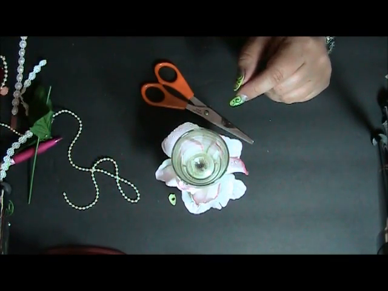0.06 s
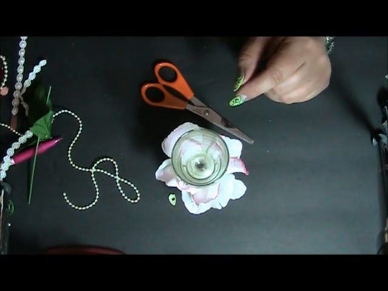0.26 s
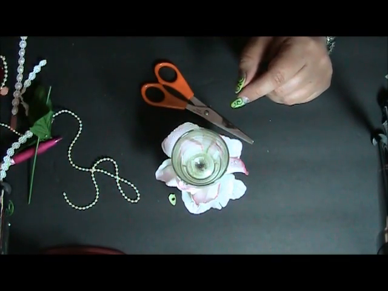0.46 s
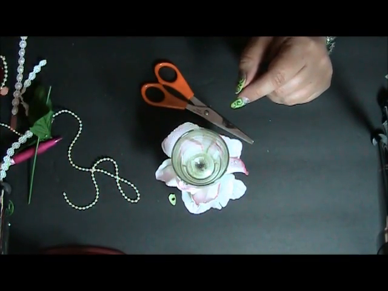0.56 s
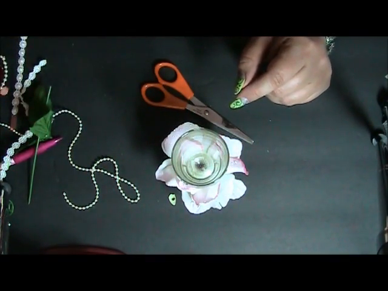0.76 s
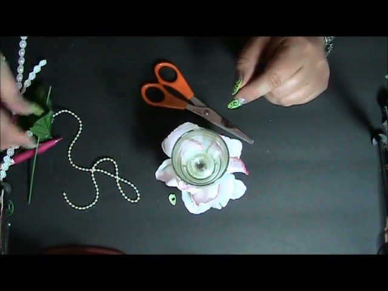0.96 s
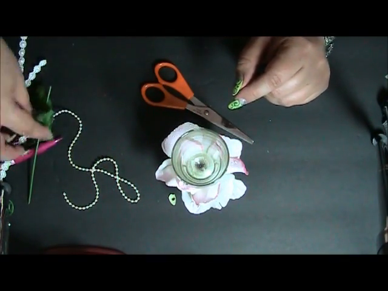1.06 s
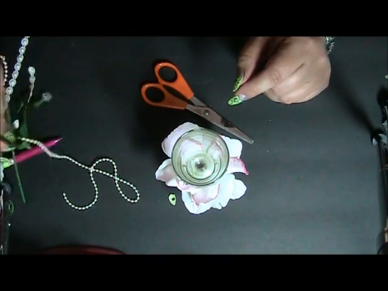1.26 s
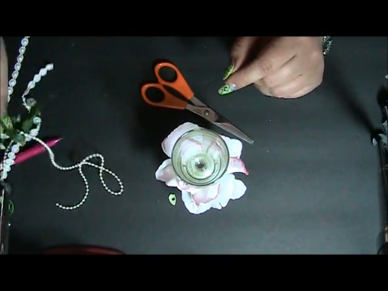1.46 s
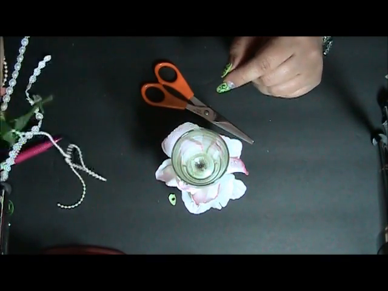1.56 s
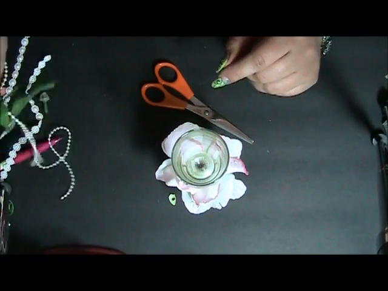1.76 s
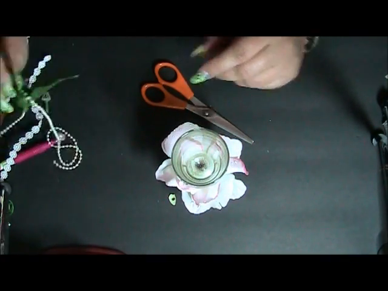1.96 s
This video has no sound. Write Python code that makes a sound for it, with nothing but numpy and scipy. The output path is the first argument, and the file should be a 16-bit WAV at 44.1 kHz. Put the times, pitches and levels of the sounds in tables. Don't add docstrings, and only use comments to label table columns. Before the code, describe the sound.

Stiff fabric leaves are brushed very faintly, then, after a pause, lifted with dry crinkling, plastic snaps and tiny bead ticks, close and slightly left in a softly humming, hissing indoor room.

```python
import sys
import numpy as np
from scipy import signal
from scipy.fft import rfft, irfft, next_fast_len
from scipy.io import wavfile
from scipy.ndimage import map_coordinates

SR = 44100
rng = np.random.default_rng(int(sys.argv[2]) if len(sys.argv) > 2 else 0)


def generate_wav(sig):
    pcm = np.round(np.clip(np.atleast_2d(sig).T, -1, 1) * 32767).astype(np.int16)
    wavfile.write(sys.argv[1], SR, pcm)


def amplitude_ratio(level_db):
    exponent = np.asarray(level_db, float) / 20
    return 10 ** exponent


N = 88861

# freq_hz, level_db
TICK_COLOUR = [(3500, -17), (6000, 0.5), (8500, -4.5), (11000, -6), (15500, -10.5)]


def handling():
    # time_s, effort_db, crispness_db
    lift_effort = [(1.078, -72, 12), (1.092, -39, 11.5), (1.125, -38.5, 3.5), (1.16, -41, 3),
                   (1.22, -40.5, -2.5), (1.29, -45.5, 1.5), (1.33, -40.5, -2), (1.35, -44, 2),
                   (1.40, -34.5, -3), (1.44, -39, 0.5), (1.525, -39.5, 0), (1.56, -48, 1.5), (1.64, -38, 4),
                   (1.69, -46, 5), (1.755, -49, 5), (1.78, -41, 0), (1.86, -44, 6), (2.015, -44.5, 0.5)]
    # freq_hz, density_db (per Hz)
    leaf_colour = [(290, -43.5), (500, -13), (629, -11.5), (1100, -10.5), (2570, -0.5), (4570, -7.5),
                   (5350, -16.5), (6740, -15.5), (15500, -59)]
    effort, crisp = curves(lift_effort)
    rub = coloured(clicks(.15, 2.5), leaf_colour) * amplitude_ratio(-6 + 2.4 * wobble(70))
    crinkle = amplitude_ratio(-8) * grains(rate=700, hz=2446, octaves=0.19, cycles=2.3, spread_db=3.5, taut_oct=0.2)
    sparkle = amplitude_ratio(-18.5) * grains(rate=800, hz=6770, octaves=.33, cycles=6.8, spread_db=5.5, taut_oct=0)
    two_sided = np.array([clicks(.1, 2.3), clicks(0.054, 2.3)])
    fizz = coloured(two_sided, TICK_COLOUR) * amplitude_ratio(-19 + 0.92 * wobble(90))
    return effort * (rub + crinkle + crisp * sparkle), effort * crisp * fizz


def snaps():
    # start_s, peak_db, ring_hz, bright_tick_db, t60_ms
    stem_snaps = [(.6488, -45, 1330, -25, 8), (.678, -46, 3300, -30, 11), (0.71, -49, 2760, -16, 8),
                  (.7403, -38.5, 3520, -20, 8.8), (1.093, -26, 2870, -9, 8.2),
                  (1.1061, -26, 3530, -19, 9.8), (1.1342, -27.5, 2470, -30, 13),
                  (1.168, -25, 2620, -32, 6.6), (1.1984, -17.5, 2500, -49, 10.5),
                  (1.2052, -23, 2880, -33, 3.5), (1.3133, -29, 2290, -30, 9.1),
                  (1.3191, -18.5, 3930, -28, 6), (1.3912, -22, 3610, -30, 8.3),
                  (1.3938, -20, 3080, -20.5, 8.8), (1.4055, -21.5, 2860, -28, 6.5),
                  (1.4109, -19, 2930, -30, 3.3), (1.478, -24.5, 2520, -21, 10),
                  (1.536, -34, 2460, -18, 7.5), (1.5769, -27.5, 2430, -21, 6.3),
                  (1.634, -14.5, 2553, -22, 12.2), (1.7024, -31, 3400, -20, 6),
                  (1.7033, -29.5, 2800, -20, 8.6), (1.7122, -27, 3240, -22, 6.6),
                  (1.7295, -29.5, 2980, -18, 6), (1.7434, -29.5, 2800, -20, 7),
                  (1.7636, -30, 3030, -29, 20), (1.7696, -19.5, 2730, -27, 9.2),
                  (1.9489, -31.5, 2630, -15, 4.4)]
    # ratio, level_db
    stem_partials = [(.67, -7), (1.004, 3), (1.36, -4.5), (1.599, -5.5), (1.95, -13), (2.55, -7)]
    # freq_hz, level_db
    crack_colour = [(700, -44), (1400, -9), (2400, -5), (4200, -2.5), (6500, -11), (10000, -22.5),
                    (15500, -24)]
    # freq_hz, level_db
    snap_tick_colour = [(3500, -21), (6300, -10), (8500, 0.5), (10000, -5.5), (15500, -17)]
    stiff_hz = 6020
    ring, crack, tick = np.zeros((3, N + SR))
    t = np.arange(SR // 20) / SR
    rise = 1 - np.exp(-t / .0003)
    for start_s, peak_db, ring_hz, bright_db, t60_ms in stem_snaps:
        span = slice(round(start_s * SR), round(start_s * SR) + len(t))
        noise = np.sign(rng.standard_normal((2, len(t))))
        fall_db = -60 * t / (t60_ms / 1000)
        tone = 0
        for ratio, level_db in stem_partials:
            hz = ring_hz * ratio
            level = amplitude_ratio(level_db + rng.uniform(-0.58, 1.65)) / (1 + (hz / stiff_hz) ** 4)
            tone = tone + level * np.sin(2 * np.pi * hz * t)
        ring[span] += amplitude_ratio(peak_db - 1 + fall_db) * rise * tone
        crack[span] += amplitude_ratio(peak_db - 10 + fall_db / 0.76) * rise * noise[0]
        tick[span] += amplitude_ratio(peak_db + bright_db + 2 + fall_db / 0.91) * np.sqrt(rise) * noise[1]
    return ring[:N] + coloured(crack[:N], crack_colour), coloured(tick[:N], snap_tick_colour)


def creases():
    # start_s, level_db, pitch_hz
    crease_events = [(0.682, -44, 2760), (1.1003, -36, 2380), (1.1185, -30, 2440), (1.1444, -32, 2310),
                     (1.1836, -38, 2470), (1.2291, -33, 2200), (1.2456, -29.5, 2360), (1.2643, -39, 2370),
                     (1.2692, -39, 2410), (1.2796, -31, 2350), (1.3012, -38, 2560), (1.3236, -36, 4000),
                     (1.3294, -37.7, 3790), (1.3686, -33, 2520), (1.3746, -36, 2540), (1.383, -28.5, 2450),
                     (1.4169, -39, 3540), (1.4296, -34, 2520), (1.4437, -34, 2220), (1.4463, -28.5, 2600),
                     (1.4566, -29, 2440), (1.4604, -33.3, 2490), (1.4631, -32, 2550), (1.4847, -35, 2440),
                     (1.4907, -33, 2430), (1.4958, -31, 2000), (1.508, -33.8, 2400), (1.5152, -33.4, 2500),
                     (1.5217, -33, 2460), (1.5254, -29, 2470), (1.5285, -29, 2360), (1.5851, -33, 2350),
                     (1.589, -39, 2240), (1.6224, -30, 2590), (1.6284, -35, 2560), (1.6422, -39, 2460),
                     (1.6462, -34, 2230), (1.687, -35, 3060), (1.6921, -34.9, 2720), (1.7255, -35, 3680),
                     (1.7764, -34, 2720), (1.7859, -35, 2880), (1.8038, -32, 3090), (1.8153, -41, 2530),
                     (1.8419, -36, 3270), (1.8481, -35.5, 2900), (1.8693, -42, 3010), (1.8951, -38, 2950),
                     (1.8996, -41, 2760), (1.9058, -38.3, 2740), (1.931, -32.5, 2730), (1.9413, -43, 2340),
                     (1.9611, -34, 2590), (1.9783, -34, 2440), (1.9809, -44, 2570), (1.9932, -38.8, 2500)]
    # ratio, level_db
    fold_partials = [(.66, -12.5), (1, 0.5), (1.45, -9)]
    return folds(crease_events, 5.5, -3, fold_partials)


def pings():
    # start_s, level_db, pitch_hz
    ping_events = [(0.6407, -39.5, 8250), (0.7401, -46, 5950), (1.0931, -39, 6960), (1.0958, -39, 6860),
                   (1.1012, -40, 6740), (1.1156, -29, 9200), (1.1359, -38.2, 6470), (1.1682, -44, 6300),
                   (1.1979, -59, 6600), (1.2177, -45, 5300), (1.3197, -48, 5450), (1.3233, -48, 5250),
                   (1.3928, -41, 5160), (1.3949, -35, 8050), (1.4105, -45, 5510), (1.4316, -36, 6200),
                   (1.4778, -40.3, 5500), (1.5299, -36, 6200), (1.535, -34.5, 5370), (1.5769, -52, 6070),
                   (1.5805, -34, 6330), (1.5831, -38, 6500), (1.6357, -26, 6330), (1.6651, -32.5, 5510),
                   (1.7697, -34, 5750), (1.8612, -41, 6720), (.6325, -53, 8000), (.6525, -48, 8000),
                   (.7195, -51, 8100), (.724, -53, 7900), (1.6355, -24, 4160)]
    return folds(ping_events, 11, -3, [(0.97, 0)])


def folds(events, cycles, gain_db, partials):
    x, t = np.zeros(N + SR), np.arange(SR // 100) / SR
    for start_s, level_db, pitch_hz in events:
        u = t * pitch_hz / cycles
        rough = .22 * np.cumsum(rng.standard_normal(len(t))) * np.sqrt(pitch_hz / SR)
        tone = 0
        for ratio, partial_db in partials:
            phase = 2 * np.pi * (pitch_hz * ratio * t + rng.random()) + rough
            tone = tone + amplitude_ratio(partial_db) * np.sin(phase)
        swell = (2 * np.e * u * np.exp(-2 * u)) ** 2
        x[round(start_s * SR):][:len(t)] += amplitude_ratio(level_db + gain_db) * swell * tone
    return x[:N]


def beads():
    # start_s, peak_db
    bead_ticks = [
        (1.1348, -28.5),
        (1.7637, -41),
        (1.817, -41),
        (1.8388, -52),
        (1.8476, -46),
        (1.853, -40),
        (1.8616, -34.5),
        (1.8655, -42),
        (1.8922, -49),
        (1.7155, -42),
    ]
    # freq_hz, level_db
    bead_colour = [(4000, -34), (7000, 1), (11000, 0), (15000, 4)]
    x, t = np.zeros(N + SR), np.arange(200) / SR
    for start_s, peak_db in bead_ticks:
        noise = np.sign(rng.standard_normal(len(t)))
        x[round(start_s * SR):][:len(t)] += amplitude_ratio(peak_db - 0.5 - 60 * t / 0.0057) * noise
    return coloured(x[:N], bead_colour)


def brush():
    # time_s, effort_db, crispness_db
    brush_effort = [
        (.626, -68, 3),
        (.634, -57, 6),
        (.685, -56.5, -2),
        (.70, -61.5, -4),
        (.75, -60, -7),
        (.765, -68.5, 5.5),
        (.96, -72, 5.5),
    ]
    # freq_hz, density_db (per Hz)
    sleeve_colour = [(240, -57), (400, -0.5), (1020, -3.5), (1690, 0.5), (2280, -6), (3310, -2),
                     (14000, -29)]
    effort, crisp = curves(brush_effort)
    rub = coloured(clicks(.1, 4.0), sleeve_colour) * amplitude_ratio(0.5 + 2.2 * wobble(59.3))
    edge = amplitude_ratio(-9.5) * coloured(clicks(0.095, 4.1), TICK_COLOUR)
    return effort * (rub + crisp * edge)


def thuds():
    # start_s, level_db, pitch_hz
    finger_bumps = [
        (.648, -53, 411),
        (.731, -58, 612),
        (1.084, -44.5, 760),
        (1.132, -43.5, 708),
        (1.16, -59, 200),
        (1.411, -55.5, 197),
        (1.769, -52.5, 209),
        (1.99, -50.5, 707),
    ]
    x, t = np.zeros(N + SR), np.arange(SR // 8) / SR
    for start_s, level_db, pitch_hz in finger_bumps:
        u = t * pitch_hz / 11.3
        rough = 2.48 * map_coordinates(rng.standard_normal(200), [t * pitch_hz * 0.408])
        tone = np.sin(2 * np.pi * pitch_hz * t + rough)
        x[round(start_s * SR):][:len(t)] += amplitude_ratio(level_db) * 5 * u * np.exp(-3 * u) * tone
    return x[:N]


def unit(x):
    return x / np.sqrt(np.mean(x ** 2) + 1e-20)


def along(points, hz):
    f, v = np.transpose(points)
    return np.interp(np.log(hz + 1), np.log(f + 1), v)


def curves(rows):
    time_s, effort_db, crisp_db = np.transpose(rows)
    t = np.arange(N) / SR
    effort = amplitude_ratio(np.interp(t, time_s, effort_db, left=-120, right=-120))
    return effort, amplitude_ratio(np.interp(t, time_s, crisp_db))


def wobble(rate):
    knots = rng.standard_normal(int(N * rate / SR) + 4)
    return map_coordinates(knots, [np.arange(N) * rate / SR])


def coloured(x, points):
    m = 2 * next_fast_len(N // 2 + 4096)
    cepstrum = irfft(np.log(amplitude_ratio(along(points, np.fft.rfftfreq(m, 1 / SR))) + 1e-6), m)
    cepstrum[1:m // 2] *= 2
    cepstrum[m // 2 + 1:] = 0
    h = np.exp(rfft(cepstrum))
    return irfft(rfft(x, m) * h / np.sqrt(np.mean(abs(h) ** 2)), m)[..., :N]


def grains(rate, hz, octaves, cycles, spread_db, taut_oct, count=3000):
    u, g = rng.random((count, 2)), rng.standard_normal(count)
    at = np.cumsum(-np.log(1 - u[:, 0])) / rate * SR
    taut = at > 1.66 * SR
    f = np.clip(hz * 2 ** (octaves * g + taut_oct * taut), 300, SR / 3)[:, None]
    t = np.arange(320) / SR
    size = amplitude_ratio(spread_db * np.minimum(-np.log(1 - u[:, 1:]), 1.7))
    envelope = np.exp(-t * f / cycles) * (1 - np.exp(-t * f))
    wave = size * np.sin(2 * np.pi * f * t) * envelope
    index = at.astype(int)[:, None] + np.arange(len(t))
    return unit(np.bincount(index.ravel(), wave.ravel(), N)[:N])


def clicks(share, spread_db):
    u = rng.random((3, N))
    size = amplitude_ratio(spread_db * np.minimum(-np.log(1 - u[2]), 3.4))
    return unit((u[0] < share) * np.sign(u[1] - .5) * size)


def echo(x, decay, delay, alike):
    noise = rng.standard_normal((3, SR // 2))
    mixed = np.sqrt(alike) * noise[2] + np.sqrt(1 - alike) * noise[:2]
    hz, t, z = signal.stft(mixed, SR, nperseg=128)
    fall = amplitude_ratio(-60 * t / along(decay, hz)[:, None])
    tail = signal.istft(z * fall, SR, nperseg=128)[1]
    late = np.pad(x, (delay, 0))[None]
    return signal.fftconvolve(late, tail / np.linalg.norm(tail[0]), axes=1)[:, :N]


def air():
    # freq_hz, density_db (per Hz)
    mid_colour = [(12, -74), (20, -18), (176, -5.5), (233, -4.5), (283, -6.5), (353, -5), (384, -7.5),
                  (4230, -22), (15700, -36)]
    # freq_hz, density_db (per Hz)
    side_colour = [(12, -65), (20, -17), (98, -0.5), (137, 0.5), (208, -6), (246, -13), (494, -1.5),
                   (5280, -19.5), (15700, -34.5)]
    # multiple (of 120 Hz), mid_db, side_db
    hum_partials = [(1, -69, -71), (2, -72, -65.5), (3, -74, -66.5)]
    t = np.arange(N) / SR
    mid = amplitude_ratio(-61.5 + .6 * wobble(8.82)) * coloured(rng.standard_normal(N), mid_colour)
    side = amplitude_ratio(-58 + .6 * wobble(9.9)) * coloured(rng.standard_normal(N), side_colour)
    for multiple, mid_db, side_db in hum_partials:
        phase = 2 * np.pi * (multiple * 120 * t + rng.random((2, 1)))
        mid = mid + np.sqrt(2) * amplitude_ratio(mid_db) * np.sin(phase[0])
        side = side + np.sqrt(2) * amplitude_ratio(side_db) * np.sin(phase[1])
    return np.array([mid + side, mid - side])


def scene():
    # freq_hz, t60_s
    table_decay = [(1000, 0.042), (3000, 0.065), (12000, 0.063)]
    # freq_hz, t60_s
    room_decay = [(500, 0.53), (3000, 0.39), (12000, 0.48)]
    # freq_hz, towards_left_db
    left_lean = [(800, 1.5), (2500, 3.5), (5000, 2.5), (12000, 0.5)]
    body, fizz = handling()
    crack, tick = snaps()
    bright = tick + beads() + pings()
    leaves = body + crack + bright + brush() + thuds() + creases()
    near = leaves + fizz + amplitude_ratio(-9) * echo(leaves, table_decay, 60, 0.62)
    near = near + amplitude_ratio(-4.5) * echo(bright, [(5000, 0.023)], 10, 0)
    lean_db = along(left_lean, np.fft.rfftfreq(N, 1 / SR))
    near = irfft(rfft(near) * amplitude_ratio(np.array([lean_db, -lean_db])), N)
    return near + amplitude_ratio(-11) * echo(leaves, room_decay, 500, 0.094) + air()


def roll_off(x):
    return signal.sosfilt(signal.butter(12, 15820, fs=SR, output="sos"), x)


def record(dry):
    hz = np.fft.rfftfreq(N, 1 / SR)
    top = (hz < 15800) / (1 + (hz / 15000) ** 20)
    return roll_off(irfft(rfft(dry) * top, N))


dry = scene()
out = record(dry)
generate_wav(out)
```